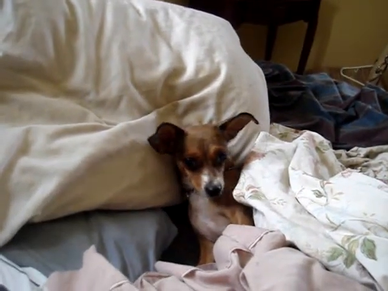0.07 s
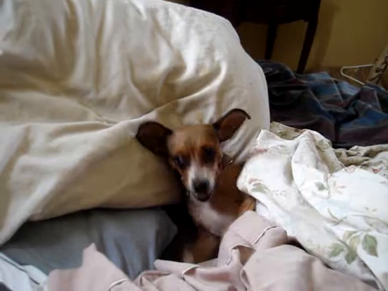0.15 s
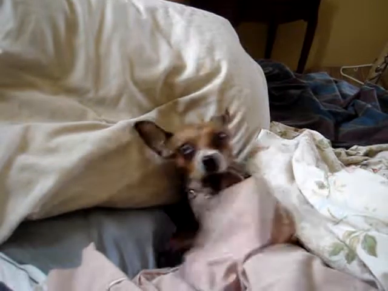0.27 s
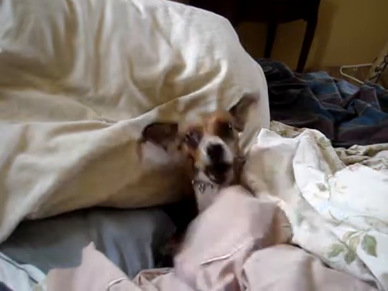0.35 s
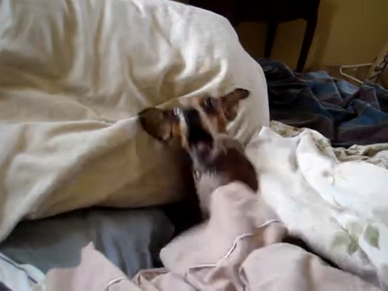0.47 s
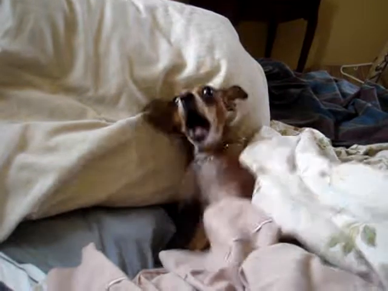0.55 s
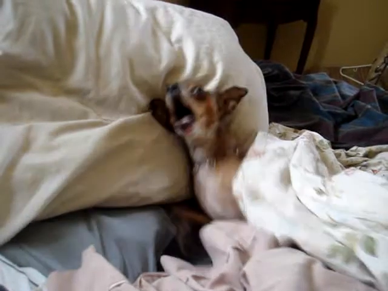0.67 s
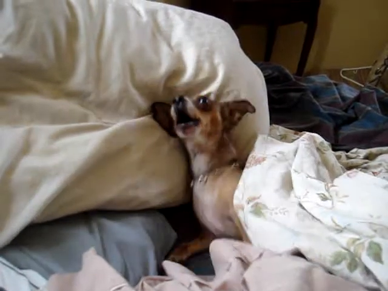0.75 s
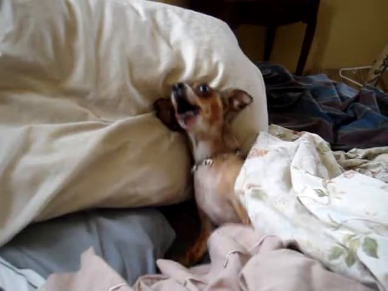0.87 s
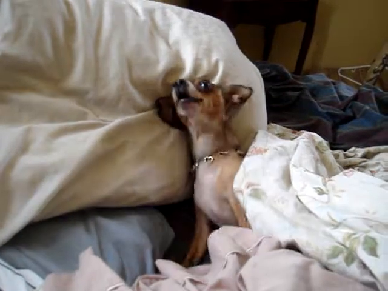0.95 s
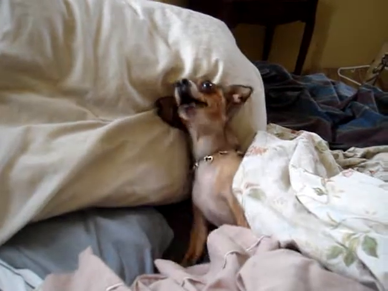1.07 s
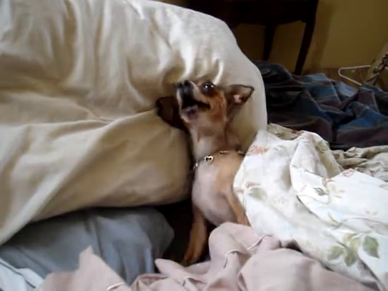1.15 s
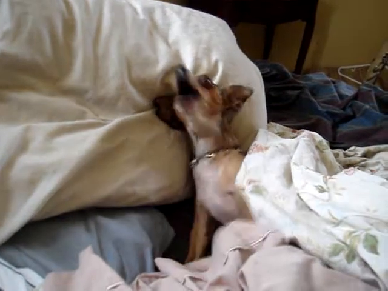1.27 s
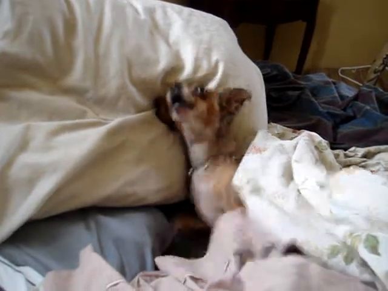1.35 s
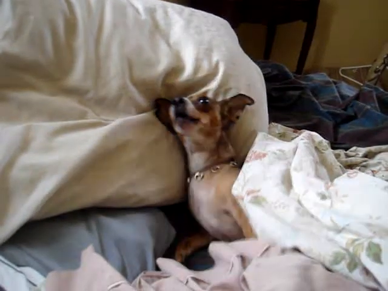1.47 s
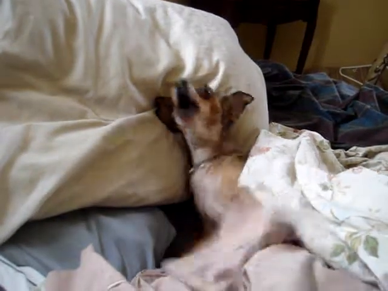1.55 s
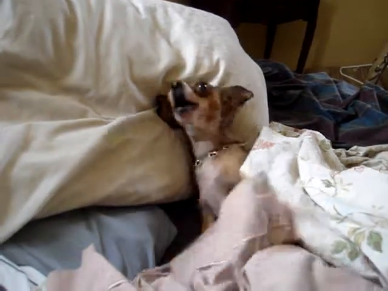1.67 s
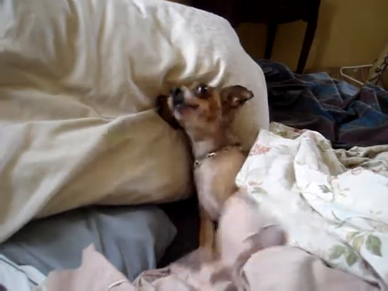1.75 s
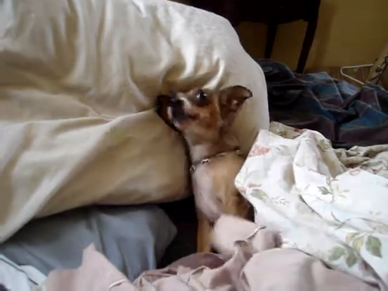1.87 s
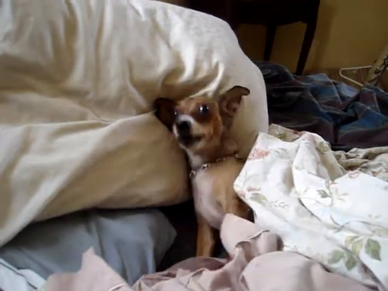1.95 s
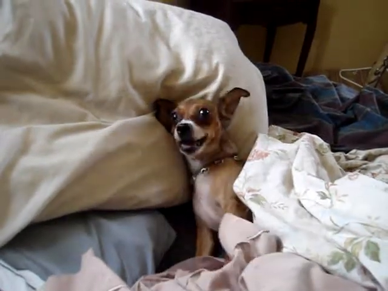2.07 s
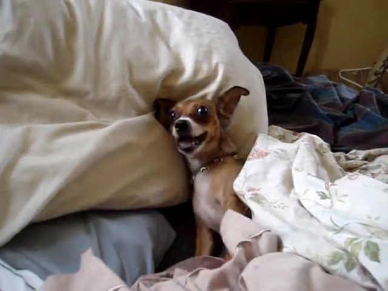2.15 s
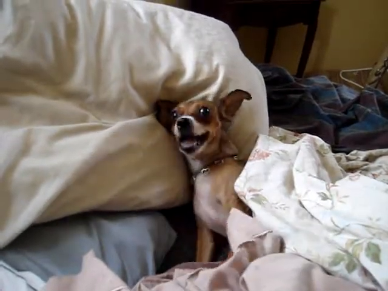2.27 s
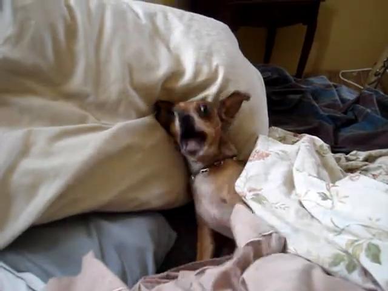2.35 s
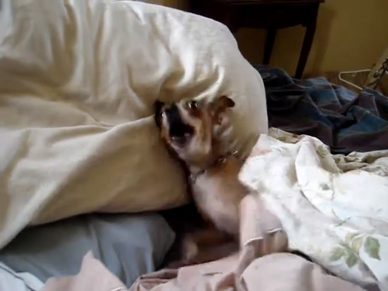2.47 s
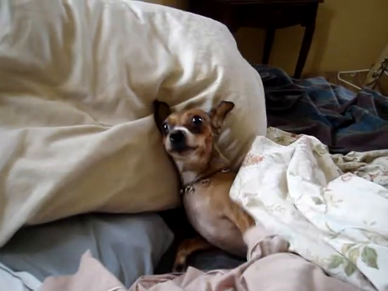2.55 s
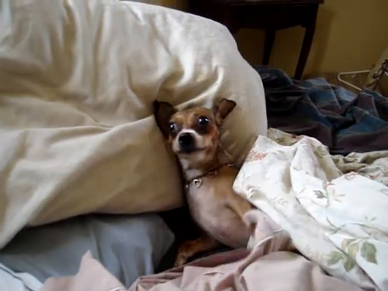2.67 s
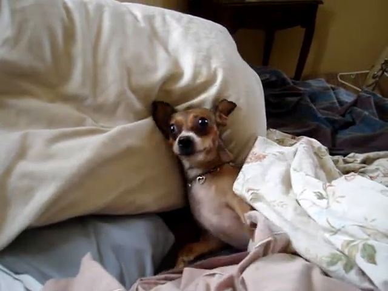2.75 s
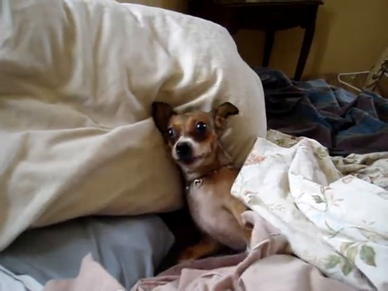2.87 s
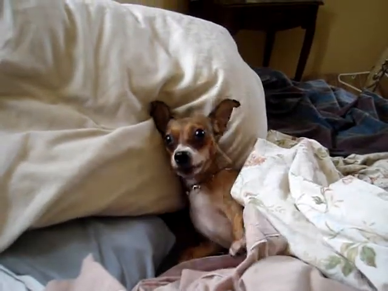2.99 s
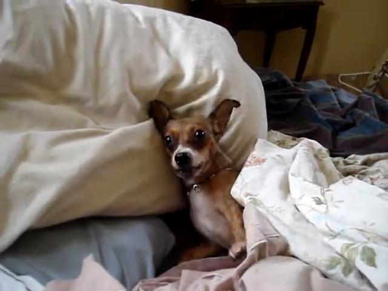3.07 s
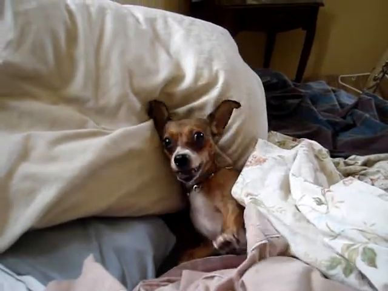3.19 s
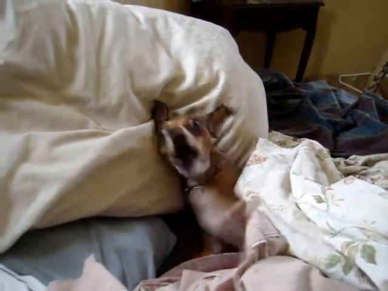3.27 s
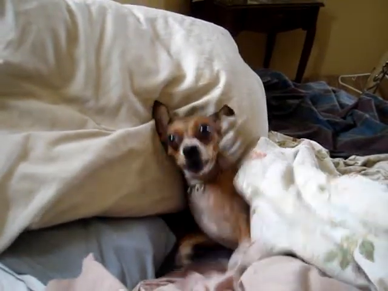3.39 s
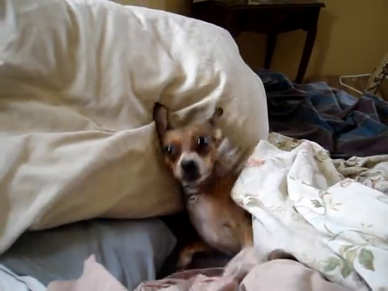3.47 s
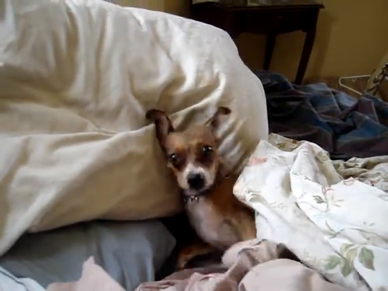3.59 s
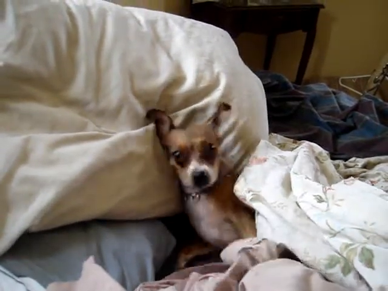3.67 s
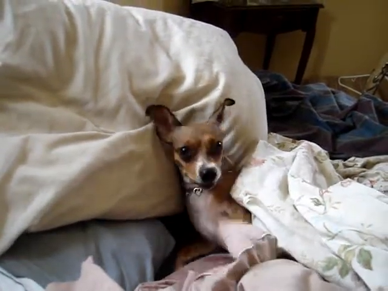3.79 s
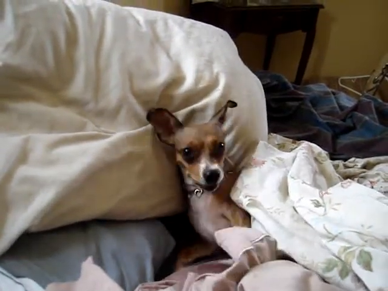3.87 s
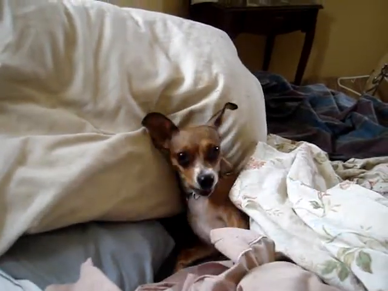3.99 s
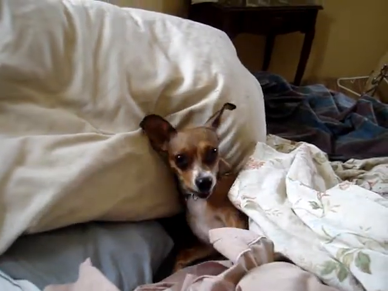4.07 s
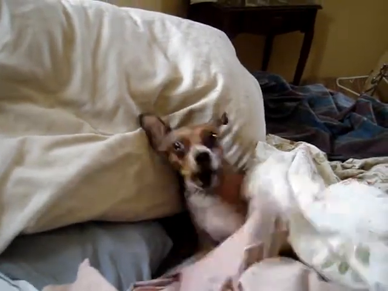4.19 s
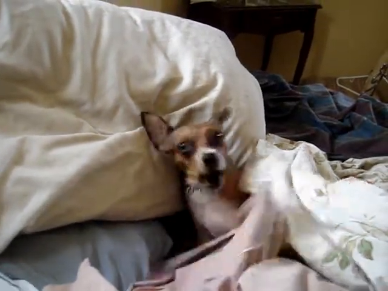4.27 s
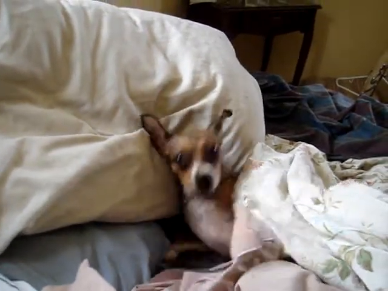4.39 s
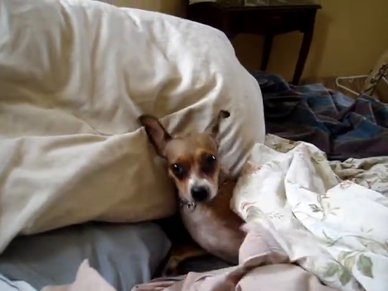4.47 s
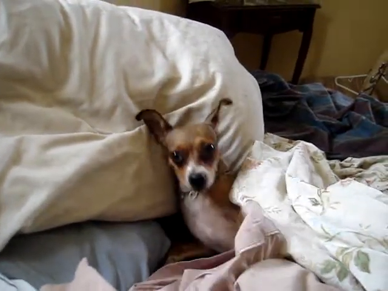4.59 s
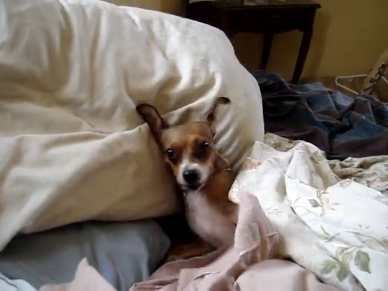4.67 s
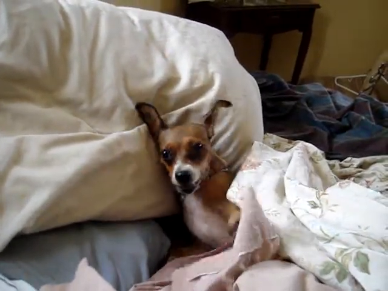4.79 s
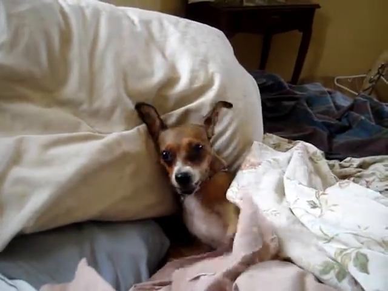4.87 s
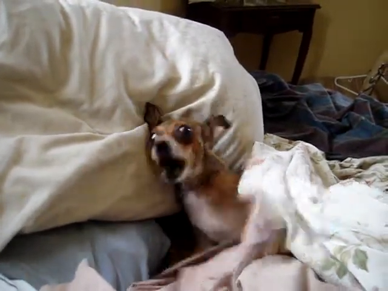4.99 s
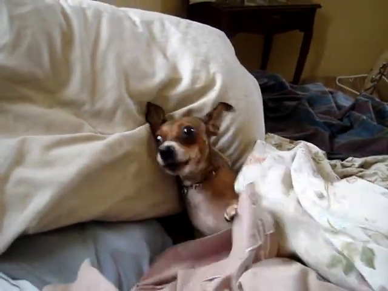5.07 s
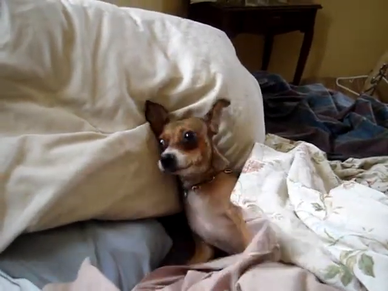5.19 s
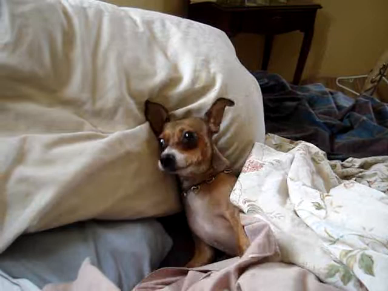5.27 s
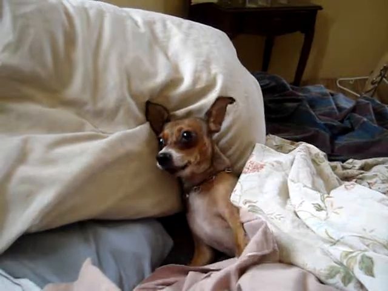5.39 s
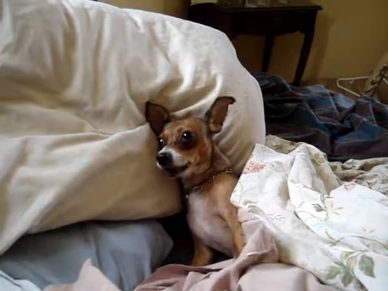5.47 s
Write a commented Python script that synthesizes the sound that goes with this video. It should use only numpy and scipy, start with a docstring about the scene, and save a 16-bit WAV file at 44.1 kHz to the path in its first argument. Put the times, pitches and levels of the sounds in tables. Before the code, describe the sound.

A small dog close to the microphone lets out a hoarse yelp that stretches into a high, cracking squeal. Two quick raspy yelps follow, then four more about a second apart, with soft groans and thin whines trailing between them. The place is a quiet bedroom with very little echo and a faint, steady appliance hum underneath.

```python
"""A faint appliance hum in a bedroom, then a small dog yelping close by, again and again.
Each yelp bursts out hoarse, chaotic vocal folds and breath ringing a wide mouth, and sinks as the jaw
shuts. The first is drawn out into a high, cracking squeal; low groans and thin whines trail the rest.
Automatic gain control ducks at the yelps and creeps back up."""
import sys
import numpy as np
from scipy import signal
from scipy.fft import rfft, irfft, next_fast_len
from scipy.io import wavfile
from scipy.ndimage import uniform_filter1d, minimum_filter1d, map_coordinates

SR = 44100
rng = np.random.default_rng(int(sys.argv[2]) if len(sys.argv) > 2 else 0)


def int16_out(signal):
    """Quantize to a 16-bit WAV file."""
    q = np.round(np.clip(np.atleast_2d(signal).T, -1, 1) * 32767)
    wavfile.write(sys.argv[1], SR, q.astype(np.int16))


N = 243873

# mains harmonics: freq_hz, level_db
MAINS_HUM = [(120, -51), (240, -40.5), (360, -54.5), (480, -46)]
# room air spectrum: freq_hz, gain_db
AIR_SPECTRUM = [(25, -7), (80, -17), (180, -6), (330, 0), (650, 7), (1000, -0.5), (1800, -4.5), (4000, -10),
                (7000, -17.5), (10000, -39.5)]
# yelps: start_s, lead_s, length_s, top_hz, throat_db, rasp_db, push_db, jaw_stretch, f2_shift_hz,
# f3_hz, f3_db
YELP_EVENTS = [(0.267, 0, 0.1633, 892.9, 18, 22.5, 7, 0.953, -53, 4461, -3),
               (1.275, 0.0054, 0.184, 801, 10.5, 15.5, -5.5, 0.92, -170, 4124, -7),
               (1.599, .07, 0.169, 814.5, 7.5, 12.5, 5, 0.97, -170, 4250, -1.5),
               (2.408, 0, 0.1743, 898.5, 7, 12, 18, 0.992, -18.5, 4187, 1.5),
               (3.305, 0.00037, 0.1988, 888, 7.5, 11.5, 1.5, 0.931, 31.5, 4474, 0),
               (4.204, 0, .2, 916.8, 8.5, 11.5, 2, 1.074, 84, 4693, -1),
               (4.974, 0.00172, 0.2, 893.8, 8, 10.5, -3, 1.007, 119.5, 4488, 1)]
# formants as the jaw opens and shuts: age_s, f1_hz, f2_hz
JAW_PATH = [(-.05, 960, 2663), (0, 1300, 3030), (.028, 1360, 3250), (.058, 940, 2750), (.086, 1030, 1980),
            (.122, 1230, 2290), (.17, 1007, 2480), (.21, 880, 2350)]
# hoarse voice colour around formant 1: freq_hz, gain_db
THROAT_COLOUR = [(250, -45), (400, -19.5), (520, 11), (900, 2), (1400, 3.5), (3000, 4.5)]
# hoarse voice colour above formant 1: freq_hz, gain_db
RASP_COLOUR = [(300, -37), (900, -19), (1700, 2.5), (3000, 0), (5000, -1), (6000, 15.5), (7000, 3.5),
               (8200, -6), (9000, -9.5), (10000, -12)]
# rasp under the squeal: crest_s, rise_s, fall_s, pitch_hz, throat_db, rasp_db
STRAIN_EVENT = (.465, .1, 0.538, 1000, 8.73, 18)
# mouth during that rasp: f1_hz, f2_hz, f3_hz, f3_db
STRAIN_FORMANTS = (1301, 2580, 4327, 6.5)
# squeal contour: time_s, pitch_hz, base_db
SQUEAL_PATH = [(0.47, 1593, -13.5), (0.498, 1810, -20), (0.524, 1824, -12), (0.54, 1739, -18),
               (0.558, 1812, -16.5), (0.576, 1807, -15.5), (0.594, 1610, -17), (0.63, 1821, -16.5),
               (0.684, 1872, -13.5), (0.824, 1666, -21), (0.856, 1653, -19.5), (0.926, 1765, -15),
               (0.966, 1906, -20), (1.03, 1854, -43.5)]
# period doubling in the squeal: time_s, half_width_s, doubling_rise_db
SQUEAL_CRACKS = [(.525, 0.032, 12), (.64, 0.018, 12), (0.751, .025, 13.5), (0.934, 0.0139, 25.5)]
# throat response in the squeal: freq_hz, gain_db
SQUEAL_COLOUR = [(900, -20), (1800, -4), (2700, 2), (3600, 3), (4500, -3), (5400, -1.5), (6300, -16),
                 (7400, -12.5), (9000, -30.5), (10000, -56)]
# groans: crest_s, rise_s, fall_s, pitch_hz, throat_db, rasp_db, f1_hz, f3_db
GROAN_EVENTS = [(1.008, 0.017, 0.018, 873.3, -10, -2, 1143, -22),
                (1.47, .04, 0.052, 556.6, 6.5, 1.5, 1026, 1),
                (1.779, .03, .16, 514.5, -2, -13.5, 891.6, -15),
                (1.971, .085, 0.02, 604.2, -7, -12, 869, -10),
                (2.73, 0.087, 0.23, 494.3, -12, -39, 850, -3.5),
                (2.901, 0.12, 0.06, 584.1, -12.5, -23.5, 887, 7),
                (3.551, .04, 0.2017, 547.1, -11.5, -29, 889, -1.5),
                (3.849, .06, 0.027, 600.5, -18, -26.5, 957, 0),
                (4.47, .05, 0.16, 579.7, -14.5, -26.5, 1016, 0),
                (4.68, .1, 0.013, 537, -15.5, -24, 1044, -1),
                (5.22, 0.039, 0.17, 545.8, -17, -34.5, 916, 0),
                (5.4, .07, 0.016, 567, -12.5, -34.5, 871, 6.5)]
# whines: crest_s, rise_s, hold_s, fall_s, opening_hz, crest_hz, closing_hz, level_db
WHINE_EVENTS = [(1.437, 0.011, 0.00845, 0.005, 1068, 1068, 1031, 19.5),
                (1.484, 0.03, 0.0028, 0.0261, 1096, 886, 912, 8),
                (1.733, .015, 0.0046, 0.0119, 1140, 1030, 1079, 10),
                (1.765, 0.016, 0.0077, 0.0386, 1087, 1013, 1036, 6.5),
                (1.979, 0.044, 0.074, 0.0226, 854.2, 973.6, 948.2, 5),
                (2.79, .07, 0.023, .03, 871.7, 930, 931, -16.5),
                (2.898, .07, .005, 0.027, 940, 955, 990, -7),
                (2.927, 0.0052, 0.0724, 0.0231, 939, 1013, 1026, 0.5),
                (3.428, 0.0085, 0.0059, 0.0129, 1010, 1058, 1078, 5),
                (3.466, .015, 0.0067, 0.017, 1002, 1051, 1008, 2),
                (3.504, 0.0155, 0.0034, 0.0218, 1004, 894, 814, 3),
                (3.723, 0.034, 0.0832, 0.0145, 1077, 958.4, 1018, -18.5),
                (3.831, 0.038, 0.0085, 0.0157, 978.2, 983.6, 934, -11.5),
                (4.349, .028, 0.002, 0.004, 1146, 1206, 1111, 13.5),
                (4.391, .012, 0.02294, 0.037, 1187, 1029, 878.7, 8.5),
                (4.548, .05, 0.023, 0.036, 1051, 1019, 1010, -18),
                (4.681, 0.0686, 0.0048, 0.0187, 1070, 1016, 1065, -6.5),
                (5.129, 0.02105, 0.0195, 0.0434, 1117, 1010, 918, 8),
                (5.27, .04, 0.039, 0.066, 1039, 1014, 993.4, -18),
                (5.394, 0.076, 0.0173, 0.0142, 970, 968, 1011, -10)]
# throat response in a whine: freq_hz, gain_db
WHINE_COLOUR = [(800, 0), (1250, 0), (1900, -21), (2900, -32), (4000, -29), (4900, -35), (5800, -55),
                (10000, -62)]
# room decay: freq_hz, t60_s
ROOM_DECAY = [(200, 0.56), (1000, 0.356), (3000, 0.482), (9000, 0.249)]
# preamplifier hiss spectrum: freq_hz, gain_db
HISS_SPECTRUM = [(50, 8.5), (600, -14.5), (3000, -1), (8000, 1.5), (10000, -9)]

TOP_HZ = 10000


def amp(db):
    """Decibels to gain."""
    return 10 ** (np.asarray(db) / 20)


def unit(x):
    """Scale to rms 1."""
    return x / np.sqrt(np.mean(x ** 2) + 1e-20)


def along(points, hz):
    """Interpolate (freq_hz, value) points on a log axis."""
    freq_hz, values = np.transpose(points)
    return np.interp(np.log(hz + 1), np.log(freq_hz + 1), values)


def curves(rows, t):
    """Interpolate each column after time_s at times t."""
    time_s, *columns = np.transpose(rows)
    return [np.interp(t, time_s, column) for column in columns]


def span(rows, rise_s, fall_s):
    """Sample indices and gate of one cry."""
    start_s, end_s = rows[0][0], rows[-1][0]
    i = np.arange(max(int((start_s - rise_s) * SR), 0), min(int((end_s + fall_s) * SR), N))
    return i, np.interp(i / SR, [start_s - rise_s, start_s, end_s, end_s + fall_s], [0, 1, 1, 0]) ** 2


def wobble(rate_hz, size):
    """Smooth random curve with knots at rate_hz."""
    knots = rng.standard_normal(int(size * rate_hz / SR) + 4)
    return map_coordinates(knots, [np.arange(size) * rate_hz / SR])


def filtered(x, response):
    """Apply a frequency response."""
    size = next_fast_len(N + SR // 2)
    return irfft(rfft(x, size) * response(np.fft.rfftfreq(size, 1 / SR)), size)[:N]


def noise(spectrum):
    """Coloured noise, rms 1."""
    return unit(filtered(rng.standard_normal(N), lambda hz: amp(along(spectrum, hz))))


def hum_and_air(air_db=-32.0):
    """An appliance hums at mains harmonics over the soft rush of the room."""
    t = np.arange(N) / SR
    hum = 0
    for hz, db in MAINS_HUM:
        peak = amp(db + 0.23 * wobble(5, N)) * np.sqrt(2)
        hum += peak * np.sin(2 * np.pi * hz * t + rng.uniform(0, 2 * np.pi))
    return hum + amp(air_db) * noise(AIR_SPECTRUM)


def formant(hz, centre_hz, width_hz):
    """Squared resonance response, 1 at its centre."""
    return (hz * width_hz / np.hypot(centre_hz ** 2 - hz ** 2, hz * width_hz)) ** 2


def mouth_response(hz, f2_hz, f3_hz, f3_db):
    """Upper resonances: a closing jaw sharpens formant 2 and brings a shrill peak forward."""
    closing = np.clip((3200 - f2_hz) / 1200, 0, 1)
    second = formant(hz, f2_hz, width_hz=950 - 450 * closing)
    third = amp(f3_db - 2.5) * formant(hz, f3_hz, width_hz=1200)
    mouth = np.hypot(second, third) / np.hypot(1, (hz / (1.2 * f3_hz)) ** 12)
    shrill = amp(-25.5 + 18.42 * closing + f3_db / 2) * formant(hz, centre_hz=7723, width_hz=1520)
    return np.hypot(mouth, shrill) * amp(along(RASP_COLOUR, hz))


def chaotic_folds(pitch_hz):
    """Vocal pulses and pulsed breath: overtones slip out of step, strong and weak cycles alternate."""
    size = len(pitch_hz)
    phase = 2 * np.pi * np.cumsum(pitch_hz * (1 + .055 * wobble(380, size))) / SR
    pulses = sum(np.cos(k * phase + 1.2 * wobble(100, size)) * (k * pitch_hz < TOP_HZ)
                 for k in range(1, 20))
    pulses = -unit(pulses * (1 + .5 * np.cos(phase / 2)))  # each closure is a pressure dip
    breath = unit(rng.standard_normal(size) * (1 + 0.087 * np.cos(phase)))
    return np.array([pulses, breath])


def hoarse_voice(rows, flutter_db=5.0):
    """Folds ring moving formants. Rows: time_s, pitch_hz, throat_db, rasp_db, f1_hz..f3_hz, f3_db."""
    i, gate = span(rows, rise_s=.006, fall_s=0.0627)
    pitch_hz, throat_db, rasp_db = curves(rows, i / SR)[:3]
    hz, t, (pulses, breath) = signal.stft(chaotic_folds(pitch_hz), SR, nperseg=512, noverlap=448)
    hz = hz[:, None]
    f1_hz, f2_hz, f3_hz, f3_db = curves(rows, i[0] / SR + t)[3:]

    def tremor():
        """Formant flitter that makes the rasp ragged."""
        return 1 + .035 * wobble(70, len(i) + 512)[(t * SR).astype(int)]

    def ring(response, breath_share):
        """Pulses and breath through a response, levelled to rms 1."""
        mix = response * (np.sqrt(1 - breath_share) * pulses + np.sqrt(breath_share) * breath)
        wave = signal.istft(mix, SR, nperseg=512, noverlap=448)[1][:len(i)]
        return wave / np.sqrt(np.abs(uniform_filter1d(wave ** 2, size=700)) + 1e-12)

    body = amp(along(THROAT_COLOUR, hz))  # too small to radiate bass
    throat = ring(formant(hz, f1_hz, width_hz=340.6) * body, breath_share=.27)
    rasp = ring(mouth_response(hz, f2_hz * tremor(), f3_hz * tremor(), f3_db), breath_share=.33)
    voice = amp(throat_db) * throat + amp(rasp_db) * rasp
    out = np.zeros(N)
    out[i] = gate * voice * amp(flutter_db * wobble(157.3, len(i)) / 2)
    return out


def yelp(start_s, lead_s, length_s, top_hz, throat_db, rasp_db, push_db, jaw_stretch, f2_shift_hz,
         f3_hz, f3_db):
    """Hoarse burst: pitch scoops up and sags; force holds, drops and fades as the jaw shuts."""
    scoop_s, sag_after_s, sag_hz_per_s = .062, .125, 1100
    lead_db_per_s, dimming_db_per_s = 185, 46.5
    age_s = np.linspace(-lead_s, length_s, num=60)
    tail_s = np.maximum(age_s - sag_after_s, 0)
    scoop = np.interp(age_s + lead_s, [0, scoop_s + lead_s / 2], [.7, 1])
    pitch_hz = top_hz * scoop - sag_hz_per_s * tail_s

    def force_db(hold_s, drop_db, fade_db_per_s, drop_s=0.0538):
        """Soft lead-in, hold, drop and fade, with a late change in the push of air."""
        soft_db = 12 * (age_s < 0) * np.clip(1 - (age_s + lead_s) / 0.028, 0, 1)
        dropped_db = drop_db * np.clip((age_s - hold_s) / drop_s, 0, 1)
        faded_db = fade_db_per_s * np.maximum(age_s - hold_s - drop_s, 0)
        late_db = push_db * np.exp(-((age_s - 0.18764) / 0.014) ** 2)
        return late_db - soft_db - dropped_db - faded_db

    throat_db += force_db(hold_s=0.0395, drop_db=9.5, fade_db_per_s=78.5)
    rasp_db += force_db(hold_s=0.07145, drop_db=15.5, fade_db_per_s=95.5)
    rasp_db += lead_db_per_s * np.minimum(age_s, 0)
    f1_hz, f2_hz = curves(JAW_PATH, age_s / jaw_stretch)
    shut = (f2_hz.max() - f2_hz) / np.ptp(f2_hz) - .5
    f3_hz += 490 * shut
    f3_db -= 7.5 * shut + dimming_db_per_s * tail_s
    course = [start_s + age_s, pitch_hz, throat_db, rasp_db, f1_hz, f2_hz + f2_shift_hz, f3_hz, f3_db]
    return hoarse_voice(np.column_stack(course))


def strain(rise_db=8, throat_fade_db=55.5, rasp_fade_db=40):
    """Rasp under the squeal: grows, then clears as the pure note takes over."""
    crest_s, rise_s, fall_s, pitch_hz, throat_db, rasp_db = STRAIN_EVENT
    rows = [(crest_s - rise_s, pitch_hz, throat_db - rise_db, rasp_db - rise_db),
            (crest_s, pitch_hz, throat_db, rasp_db),
            (crest_s + fall_s, pitch_hz, throat_db - throat_fade_db, rasp_db - rasp_fade_db)]
    return hoarse_voice([(*row, *STRAIN_FORMANTS) for row in rows])


def clean_voice(rows, colour, shimmer_db, overtone_db):
    """Folds vibrate regularly. Rows: time_s, pitch_hz, level_db; under strain also doubling_db, jitter."""
    i, gate = span(rows, rise_s=.008, fall_s=0.0061)
    pitch_hz, level_db, *strained = curves(rows, i / SR)
    doubling_db, jitter = strained or (-120, .009)
    waver = .005 * wobble(60, len(i))
    phase = 2 * np.pi * np.cumsum(pitch_hz * (1 + waver + jitter * wobble(700, len(i)))) / SR
    wave, power = 0, 0
    for k in np.arange(1, 20) / 2:  # half steps: period doubling
        colour_db = along(colour, k * pitch_hz) + overtone_db * wobble(54.64, len(i))
        colour_db += (k > 1) * .3 * np.minimum(level_db, 0)  # soft notes lose overtones
        gain = amp(colour_db + (doubling_db if k % 1 else 0)) * (k * pitch_hz < TOP_HZ)
        wave += gain * np.sin(k * phase + rng.uniform(0, 2 * np.pi))
        power += gain ** 2 / 2
    out = np.zeros(N)
    out[i] = gate * amp(level_db + shimmer_db * wobble(91.74, len(i))) * wave / np.sqrt(power)
    return out


def squeal(boost_db=34, fade_db_per_s=21, settle_s=.09):
    """High strained note that cracks; its level falls as the gain recovers, so it sounds nearly steady."""
    t = np.linspace(SQUEAL_PATH[0][0], SQUEAL_PATH[-1][0], num=200)
    age_s = t - t[0]
    pitch_hz, base_db = curves(SQUEAL_PATH, t)
    level_db = base_db + boost_db - fade_db_per_s * age_s
    doubling_db = -18.5 + sum(db * np.exp(-((t - at_s) / half_width_s) ** 2)
                              for at_s, half_width_s, db in SQUEAL_CRACKS)
    jitter = 0.011 + 0.025 * np.exp(-age_s / settle_s)
    rows = np.column_stack([t, pitch_hz, level_db, doubling_db, jitter])
    return clean_voice(rows, SQUEAL_COLOUR, shimmer_db=2.0, overtone_db=2.5)


def groan(crest_s, rise_s, fall_s, pitch_hz, throat_db, rasp_db, f1_hz, f3_db):
    """Force and pitch swell and sink together behind a nearly shut mouth."""
    swell_db, hz_per_db, f2_hz, f3_hz = 13, 3.5, 2295, 4128
    swell = [(crest_s - rise_s, -swell_db), (crest_s, 0), (crest_s + fall_s, -swell_db)]
    rows = [(time_s, pitch_hz + hz_per_db * db, throat_db + db, rasp_db + db, f1_hz, f2_hz, f3_hz, f3_db)
            for time_s, db in swell]
    return hoarse_voice(rows, flutter_db=1.97)


def whine(crest_s, rise_s, hold_s, fall_s, opening_hz, crest_hz, closing_hz, level_db, swell_db=14):
    """Thin clean note: slides in as it grows, slides off as it holds and fades."""
    start_s, end_s = crest_s - rise_s, crest_s + hold_s + fall_s
    t = np.array([start_s, crest_s, crest_s + hold_s, end_s])
    pitch_hz = np.interp(t, [start_s, crest_s, end_s], [opening_hz, crest_hz, closing_hz])
    rows = np.column_stack([t, pitch_hz, level_db - swell_db * np.array([1, 0, 0, 1])])
    return clean_voice(rows, WHINE_COLOUR, shimmer_db=.5, overtone_db=1.3)


def bedroom(x, wet_db=-13):
    """Short soft reverb; each frequency decays at its own rate."""
    hz, t, spectrum = signal.stft(rng.standard_normal(SR // 2), SR, nperseg=256)
    decay = amp(-60 * t / along(ROOM_DECAY, hz)[:, None])
    tail = signal.istft(spectrum * decay, SR, nperseg=256)[1]
    tail = np.pad(tail / np.linalg.norm(tail), (SR // 200, 0))
    return x + amp(wet_db) * signal.fftconvolve(x, tail)[:N]


def gain_control(x, ceiling_db=-11.0, release_db_per_s=21):
    """Loud sound cuts the gain at once; it recovers slowly."""
    level_db = 10 * np.log10(np.abs(uniform_filter1d(x ** 2, size=360)) + 1e-12)
    excess_db = np.maximum(level_db - ceiling_db, 0)
    recovery_db = release_db_per_s * np.arange(N) / SR
    cut_db = np.maximum.accumulate(excess_db + recovery_db) - recovery_db
    return x * amp(-uniform_filter1d(cut_db, size=40))


def limiter(x, ceiling=0.6273):
    """A fast gain dip holds down each positive peak."""
    gain = ceiling / np.maximum(x, ceiling)
    return x * uniform_filter1d(minimum_filter1d(gain, size=61), size=61)


def scene():
    """The dog in the humming room."""
    yelps = sum(yelp(*row) for row in YELP_EVENTS)
    groans = sum(groan(*row) for row in GROAN_EVENTS)
    whines = sum(whine(*row) for row in WHINE_EVENTS)
    dog = yelps + strain() + squeal() + groans + whines
    return (bedroom(dog) + hum_and_air())[None]


def record(dry, hiss_db=-59):
    """Gain control, limiter, preamplifier saturation and hiss, band limit."""
    x = limiter(gain_control(dry[0]))
    headroom = np.where(x > 0, .47, .8)  # positive peaks round off first
    x = x / (1 + (x / headroom) ** 8) ** (1 / 8)
    x += amp(hiss_db) * noise(HISS_SPECTRUM)
    return filtered(x, lambda hz: hz < TOP_HZ)[None]


dry = scene()
out = record(dry)
int16_out(out)
```